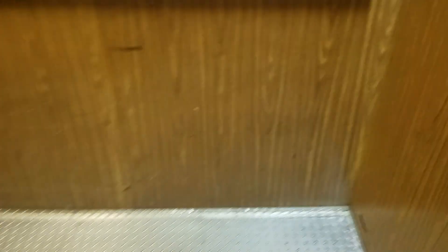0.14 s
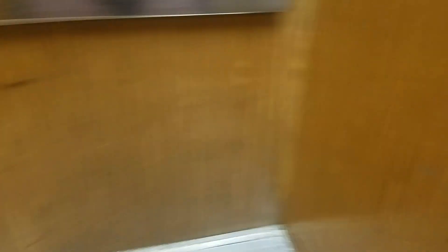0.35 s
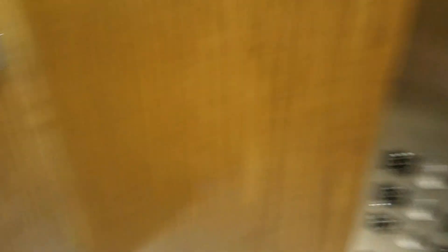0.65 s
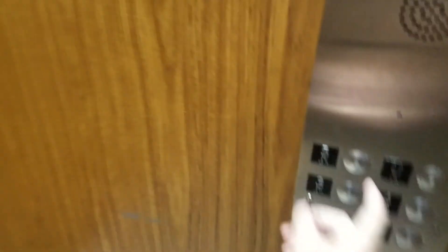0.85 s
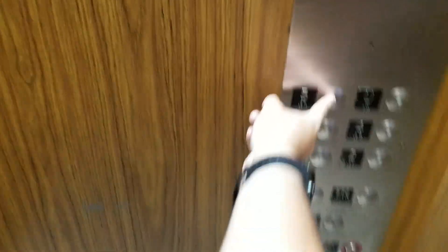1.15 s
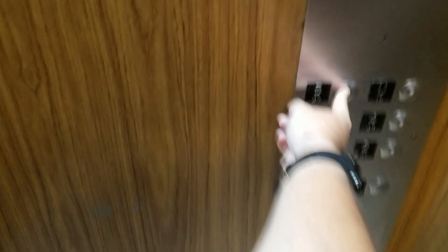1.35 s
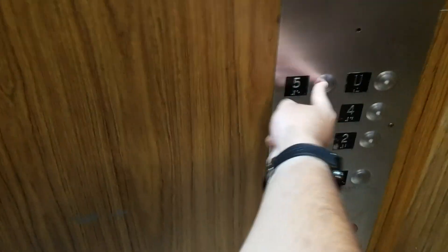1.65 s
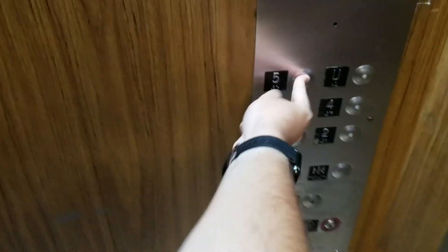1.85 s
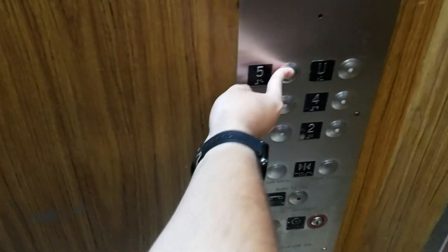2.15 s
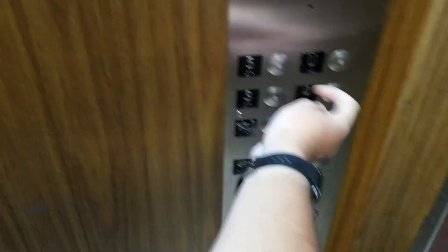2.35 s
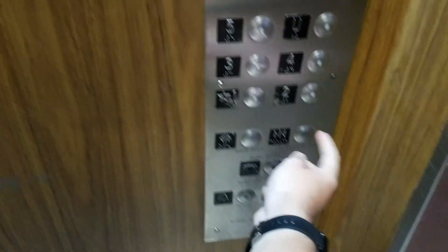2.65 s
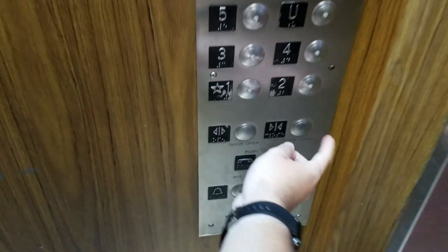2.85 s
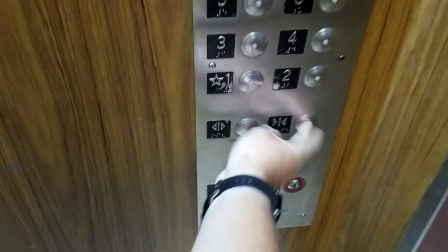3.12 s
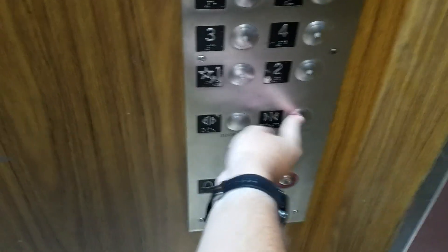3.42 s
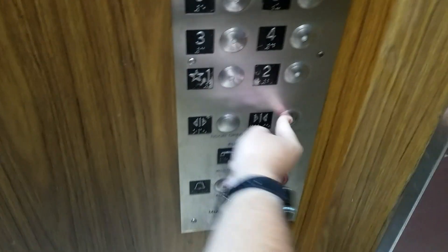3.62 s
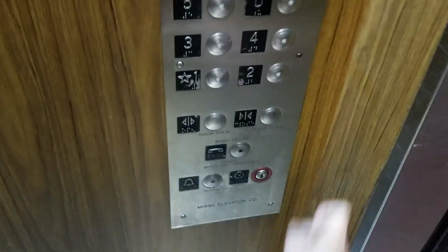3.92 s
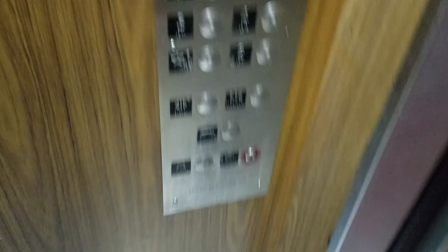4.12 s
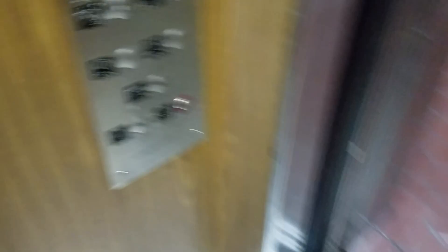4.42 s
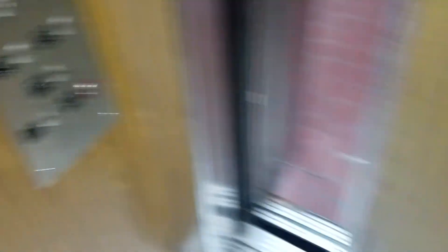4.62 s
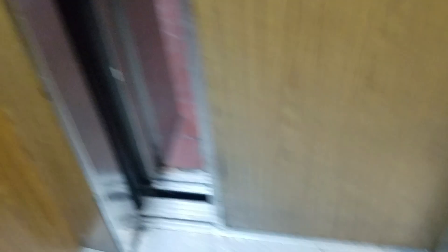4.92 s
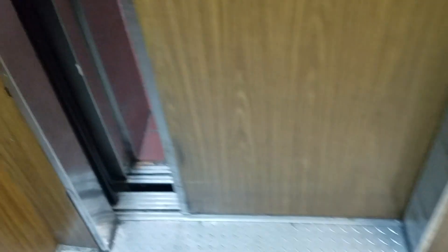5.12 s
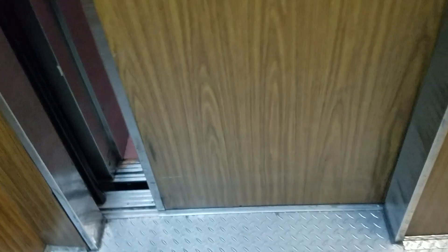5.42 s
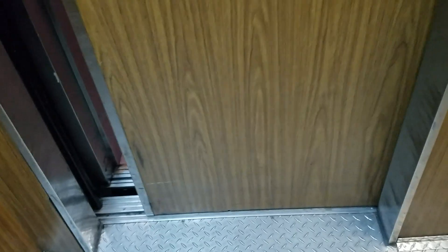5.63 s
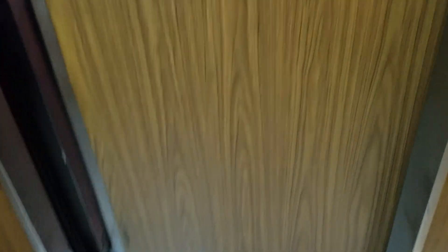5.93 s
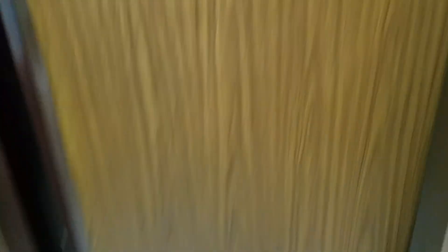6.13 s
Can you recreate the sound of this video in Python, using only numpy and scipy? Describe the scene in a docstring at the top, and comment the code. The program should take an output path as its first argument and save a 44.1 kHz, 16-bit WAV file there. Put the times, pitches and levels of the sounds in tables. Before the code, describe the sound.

Heavy steps clank on a hollow elevator floor, steel buttons click and ring, then the sliding door knocks and whirs shut over machine hum.

```python
"""Inside a small wood-panelled hydraulic elevator: machine hum and a running door drive lie under it all.
Clothes brush and heavy steps land on the hollow car floor: bursts of noise with echoes and floor modes.
Steel buttons then click and ring as clusters of close modes; a drone swells, more steps fall, a shoe squeaks.
The door gear knocks, the drive surges at 5 s and dies down, and the landing fades as the gap closes."""
import sys
import numpy as np
from scipy import signal
from scipy.fft import rfft, irfft, next_fast_len
from scipy.io import wavfile

SR = 44100
rng = np.random.default_rng(int(sys.argv[2]) if len(sys.argv) > 2 else 0)


def unload_wav(signal):
    """Save mono or channel-first audio to the path in sys.argv[1] as 16-bit WAV at rate SR, clipped to [-1, 1]."""
    wavfile.write(
        sys.argv[1],
        SR,
        np.round(np.clip(np.atleast_2d(signal).T, -1, 1) * 32767).astype(np.int16),
    )


N = 276507
TIME = np.arange(N) / SR
SIZE = 32768   # samples in one blow or ring
MOTOR_FADE_S = 0.12

# hollow modes of the car rung through the floor: pitch_hz, level_db (varied per blow), t60_s
FLOOR_MODES = [(94.24, -54.5, 0.98), (109.8, -54, 0.71), (163.44, -55, 0.78), (230.7, -59.5, 0.21),
               (385, -59, 0.69), (435, -59, 0.82), (475.5, -56, 0.5), (706, -50, 0.1), (1270, -66, 0.77),
               (1435, -66, 0.1)]


def from_db(db):
    """Decibels to gain."""
    return 10 ** (np.asarray(db) / 20)


def rms_one(x):
    """Scale to unit power."""
    return x / np.sqrt(np.mean(x ** 2) + 1e-20)


def at_hz(points, hz):
    """Read a spectrum on a log-frequency axis."""
    f, value = np.transpose(points)
    return np.interp(np.log(hz + 1e-9), np.log(f), value)


def drift(rate):
    """Slow chance with spread 1, from `rate` random knots per second."""
    knots = rng.standard_normal(int(N / SR * rate) + 2)
    return rms_one(np.interp(TIME * rate, np.arange(len(knots)), knots))


def held(start, end, fade):
    """Gain that fades in, holds at 1 and fades out."""
    return (np.tanh((TIME - start) / fade) - np.tanh((TIME - end) / fade)) / 2


def diffuse(size):
    """White noise arriving from all sides: left and right are alike in the bass only."""
    # frequency_hz, left-right likeness (0 to 1)
    likeness = [(40, 0.99), (125, 0.91), (250, 0.88), (500, 0.59), (1000, 0.16), (2000, 0), (16000, 0)]
    # frequency_hz, left minus right balance_db
    balance = [(40, 3), (125, 4), (500, 0.5), (1000, 1), (2000, 4), (4000, -3.5), (8000, -0.5), (14000, 1)]
    hz = np.fft.rfftfreq(size, 1 / SR)
    alike = np.clip(at_hz(likeness, hz), -1, 1)
    mid, side = rfft(rng.standard_normal((2, size)))
    sides = np.array([[1], [-1]])
    stereo = np.sqrt(1 + alike) * mid + sides * np.sqrt(1 - alike) * side
    return irfft(stereo * from_db(sides * at_hz(balance, hz) / 2), size)


def noise(spectrum):
    """Steady diffuse noise of a given colour, rms 1."""
    size = next_fast_len(N)
    gain = from_db(at_hz(spectrum, np.fft.rfftfreq(size, 1 / SR)))
    return rms_one(irfft(rfft(diffuse(size)) * gain, size)[:, :N])


def tone(hz, waver_hz, flutter_db):
    """One sine line, rms 1 before its flutter, slightly unsteady in pitch and strength."""
    phase = 2 * np.pi * np.cumsum(hz + waver_hz * drift(9)) / SR
    return np.sqrt(2) * np.sin(phase) * from_db(flutter_db * drift(7))


def causal(gain):
    """The minimum-phase response with these gains: nothing sounds before the blow."""
    cepstrum = irfft(np.log(gain))
    half = len(cepstrum) // 2
    return np.exp(rfft(np.r_[cepstrum[0], 2 * cepstrum[1:half], np.zeros(half)]))


def blow(length, modes, direct_db, pan_db, hardness, linger_db, linger, stretch):
    """Stereo spectrum of one uncoloured blow: the contact, dense wall echoes and the car's hollow modes."""
    # echo decay in the car: frequency_hz, t60_s (before each source's stretch)
    car_t60 = [(40, 0.081), (100, 0.19), (200, 0.42), (500, 0.6), (1000, 0.28), (2500, 0.38), (4500, 0.3),
               (6500, 0.36), (10000, 0.18), (16000, 0.22)]
    t, hz = TIME[:SIZE], np.fft.rfftfreq(SIZE, 1 / SR)
    length = max(length, 5e-4)
    slips = rng.standard_normal(SIZE) ** 3 * (t / length) * np.exp(-3 * t / length)
    # a small, hard contact radiates mostly treble
    slips = signal.lfilter([1, -np.clip(hardness, 0, .95)], [1], slips)
    contact = slips / np.linalg.norm(slips)
    out = from_db([[direct_db + pan_db / 2], [direct_db - pan_db / 2]]) * contact
    build_up = 1 - np.exp(-t / (0.0018 + .45 * length))   # a slow contact fills the car slowly
    # echoes arrive in clumps: 1.3 dB of chance, 250 times a second
    bunched = from_db(1.3 * np.interp(t * 250, np.arange(SIZE), rng.standard_normal(SIZE)))
    white = rfft(diffuse(SIZE))
    for centre in 25 * 2 ** (np.arange(20) / 2):
        band = np.clip(1 - 2 * np.abs(np.log2((hz + 1e-9) / centre)), 0, 1)   # overlapping half octaves
        fall = np.log(1000) * t / (stretch * at_hz(car_t60, centre))
        # the panels ring on after the air
        dying = np.exp(-fall) + from_db(linger_db) * np.exp(-fall / max(linger, 1))
        echoes = irfft(white * band, SIZE) * (build_up * bunched * dying)
        out = out + rms_one(echoes) * np.sqrt(np.mean(band ** 2) / SIZE)
    for mode_hz, level_db, t60 in modes:
        strength = from_db(level_db + rng.normal(0, 2.04))
        ringing = np.sin(2 * np.pi * (mode_hz * t + rng.random()))
        out = out + strength * build_up * np.exp(-np.log(1000) * t / t60) * ringing
    return rfft(out * (1 - (t / t[-1]) ** 4))   # closes to silence


def blows(rows, treble_hz, colour, modes, **contact):
    """Each blow lands at another spot, so has echoes of its own; weight adds boom, a hard contact treble."""
    boom_hz, body_hz, treble_bend = 55, 175.7, 1.98   # boom lies below the body, treble bends up above it
    out, hz = np.zeros((2, N + SIZE)), np.fft.rfftfreq(SIZE, 1 / SR)
    per_octave = SR * np.sqrt(.035 / np.maximum(hz, 30))   # equal power per octave above 30 Hz
    boom = at_hz([(boom_hz, 1), (body_hz, 0)], hz)
    treble = at_hz([(body_hz, 0), (treble_hz, 1)], hz) ** treble_bend
    for s, length, level_db, boom_db, treble_db in rows:
        tilt_db = boom_db * boom + treble_db * treble
        gain = per_octave * from_db(level_db + tilt_db + at_hz(colour, hz))
        start = int(s * SR)
        out[:, start:start + SIZE] += irfft(blow(length, modes, **contact) * causal(gain))
    return out[:, :N]


def rings(rows):
    """A struck part rings as clusters of close modes that beat and die away together."""
    out, t, bins_hz = np.zeros((2, N + SIZE)), TIME[:SIZE], np.fft.rfftfreq(SIZE, 1 / SR)
    for s, hz, spread_hz, level_db, t60 in rows:
        near_pitch = np.exp(-((bins_hz - hz) / (2 * spread_hz)) ** 2)
        cluster = irfft(rfft(diffuse(SIZE)) * near_pitch)
        dying = from_db(-60 * t / t60) * (1 - np.exp(-t * hz / 1.5))   # builds up over 1.5 cycles
        start = int(s * SR)
        ring = rms_one(cluster * dying) * np.sqrt(np.mean(dying ** 2))
        out[:, start:start + SIZE] += from_db(level_db) * ring
    return out[:, :N]


def footsteps():
    """Shoes scuff and thud on the hollow floor, exciting its low modes."""
    # feet on the car floor: start_s, scuff_length_s, level_db, extra boom_db, extra treble_db
    steps = [(.184, .018, -41, -12, -7), (.207, 0.0033, -22, -20, -18.5), (.309, 0.008, -26.5, -18, -35),
             (.435, 0.011, -28.5, -11, -13), (.457, 0.0032, -21.5, -12, -3), (.484, 0.0065, -33, -5, -6),
             (.547, 0.0085, -17.5, -19, -19.5), (.615, .021, -25, -7, -34), (.712, 0.013, -29.5, -2, -22.5),
             (.778, 0.0059, -28, -1.5, -30), (.855, 0.0049, -28, -20.5, -19), (.893, .0045, -38, 10, -22),
             (.955, .02, -29, -11, -26), (1.063, 0.0058, -32, 6, -27.5), (1.155, 0.011, -34, 3, -38),
             (1.32, 0.045, -36.5, 5, -36), (3.246, 0.023, -29.5, -3.5, -37.5),
             (3.275, 0.0098, -25.5, -14.5, -39.5), (3.333, 0.012, -36.5, 5, -48),
             (4.53, 0.038, -33, 0.5, -28), (4.572, 0.0089, -35, 6, -27)]
    # colour of a shoe on the floor: frequency_hz, level_db
    shoe = [(20, -12.5), (40, 1.5), (80, -8.5), (120, -1), (250, -1), (350, -4.5), (550, -2.5), (750, -6),
            (1100, -2.5), (2200, -2), (3500, -2.5), (8000, -3), (12000, -5), (16000, -4.5)]
    return blows(steps, 5300, shoe, FLOOR_MODES, direct_db=-8.0, pan_db=2.0, hardness=0.25,
                 linger_db=-16, linger=3.2, stretch=0.91)


def floor_plates():
    """Loose floor plates clank underfoot, each with modes spread around its pitch."""
    # clanks: start_s, pitch_hz, level_db, t60_s
    clanks = [(0.2079, 530, -12.5, 0.106), (.309, 1090, -32, 0.26), (0.552, 1290, -28, 0.26),
              (.779, 854, -23.5, 0.21)]
    spread = 0.072   # share of the pitch
    return rings([(s, hz, spread * hz, db, t60) for s, hz, db, t60 in clanks])


def buttons():
    """Steel buttons are pressed and snap back: hard contacts, then the cap or the panel rings on."""
    # contacts: start_s, contact_length_s, level_db, extra treble_db, ring_db, part that rings
    contacts = [(1.254, .005, -50.5, 3.5, -10.5, "floor"), (1.285, 0.091, -40, -10.5, -12, "floor"),
                (1.7127, .0042, -44.5, 5.5, 1, "cap"), (2.218, .0046, -51, 8, -31, "floor"),
                (2.2258, 0.0019, -35, 12, -3, "floor"), (3.022, 0.046, -41.5, -30, -29, "cap"),
                (3.086, 0.0084, -40, -17, 0.5, "cap"), (3.383, 0.002, -53, -17.5, -11.5, "cap"),
                (3.6538, 0.0026, -28, -2, 0.5, "close")]
    # colour of the panel: frequency_hz, level_db
    panel = [(30, -14.5), (100, -1.5), (200, -1.5), (350, 1.5), (650, -0.5), (1100, 0), (1600, -1.5),
             (2300, 2), (3700, -2.5), (5000, -1.5), (6500, -1.5), (8800, -6), (12000, -1.5), (16000, -9)]
    # hollow modes of the car rung through the wall: pitch_hz, level_db (varied per blow), t60_s
    wall_modes = [(187.2, -51, 0.92), (256, -64.5, 0.51), (407, -54.5, 0.51), (983, -55.5, 0.34),
                  (1157, -50.5, 0.17), (1555, -54.5, 0.14), (1866, -50, 0.21), (4370, -57, .3),
                  (6170, -61.5, 0.29)]
    # a button's cap, or the floor or door-close button with the panel behind it:
    # pitch_hz, spread_hz, level_db (the contact's ring_db is added), t60_s
    part_modes = {"cap": [(1260, 120, -40, .2), (2200, 177, -35.5, 0.17), (10400, 1500, -41.5, 0.14)],
                  "floor": [(265, 38, -30.5, .68), (2096, 170, -32.5, 0.5), (5830, 1500, -37, 0.85),
                  (11300, 900, -32.5, .38)], "close": [(194.6, 0.94, -16.5, 0.32), (1100, 86, -26, 0.4),
                  (1945, 340, -26.5, 0.41), (6460, 700, -25.5, 0.38), (9800, 2100, -25.5, 0.21)]}
    presses, ringing = [], []
    for s, length, level_db, treble_db, ring_db, part in contacts:
        presses.append((s, length, level_db, 0, treble_db))
        for hz, spread_hz, db, t60 in part_modes[part]:
            ringing.append((s, hz, spread_hz, ring_db + db, t60))
    clicks = blows(presses, 8820, panel, wall_modes, direct_db=-3.0, pan_db=8.5, hardness=0.64,
                   linger_db=-19.5, linger=5.0, stretch=0.64)
    return clicks + rings(ringing)


def door_knocks():
    """The door gear knocks as dull contacts that ring the floor's modes."""
    # knocks: start_s, contact_length_s, level_db, extra boom_db, extra treble_db
    knocks = [(4.248, 0.01, -40, -9, -19), (4.3, 0.02, -35.5, -9, -34), (4.376, 0.0048, -67.5, 0, 14),
              (4.96, 0.11, -39.5, -3, -22), (5.024, 0.01, -30.5, -7.5, -22), (5.256, 0.027, -45, -7, -59)]
    # colour of the gear: frequency_hz, level_db
    gear = [(30, -14), (100, -11), (300, -7), (1000, -3.5), (2500, -1.5), (5000, -10), (12000, -17)]
    return blows(knocks, 5100, gear, FLOOR_MODES, direct_db=-6.5, pan_db=6, hardness=0.084,
                 linger_db=-33, linger=2.0, stretch=0.89)


def squeak():
    """A faint, thin shoe squeak: one high line with a rough pitch."""
    line = tone(2810 + 30 * drift(300), waver_hz=12, flutter_db=2)
    return from_db(-55) * held(3.24, 3.32, .01) * line


def door_travel():
    """Strength of the door's drive, and how much of the landing is heard through the narrowing gap."""
    # door speed: time_s, share of top speed (the first value also holds before its time)
    door_speed = [(3.7, 0.47), (4, 0.34), (4.78, 0.39), (5, 1), (5.2, 0.62), (5.5, 0.38), (5.8, 0.19),
                  (6.27, 0.003)]
    loudness_power = 1.78   # the drive's amplitude grows with this power of the speed
    shut_door_db = -10.5   # what the shut door lets through
    doorway_db, inside_s, walk_in_s = 4, 1.26, 0.27   # the landing is louder until the listener is inside
    speed = np.maximum(np.interp(TIME, *np.transpose(door_speed)), 0)
    gap = 1 - np.cumsum(speed) / np.sum(speed)
    leak = from_db(shut_door_db) ** 2
    in_doorway = (1 - np.tanh((TIME - inside_s) / walk_in_s)) / 2
    landing = np.sqrt(leak + (1 - leak) * gap) * from_db(doorway_db * in_doorway)
    return speed ** loudness_power, landing


def motors():
    """Wavering sine lines: machine hum, drone and whine, and a door motor as loud as its speed allows."""
    # machine hum: pitch_hz, level_db (before the hum gain)
    hum_lines = [(161.5, -59.5), (269.2, -63.5), (313, -64), (333, -62), (416, -65.5), (495.3, -70)]
    # lines that swell and fade together: pitch_hz, level_db (before the drone gain)
    drone_lines = [(107.7, -0.5), (699.8, -12)]
    drive, landing = door_travel()
    hum = sum(from_db(db) * tone(hz, waver_hz=1.77, flutter_db=3.5) for hz, db in hum_lines)
    drone = sum(from_db(db) * tone(hz, waver_hz=.9, flutter_db=2.7) for hz, db in drone_lines)
    whine_on = held(1.2, 2.2, MOTOR_FADE_S) + held(3.8, 5.28, MOTOR_FADE_S)
    whine = from_db(-50.5) * whine_on * tone(352.4, waver_hz=2.476, flutter_db=3.0)
    door_motor = from_db(-36) * drive * tone(195, waver_hz=0.67, flutter_db=4.0)
    hum_gain = from_db(4.5) * landing + from_db(9.5) * drive
    drone_gain = from_db(-45.5) * landing + from_db(-48.5) * held(2.45, 3.4, MOTOR_FADE_S)
    return hum_gain * hum + drone_gain * drone + whine + door_motor


def clothes():
    """Clothes brush as the body turns: fluttering noise with rounded swells."""
    # brushes: peak_s, length_s, level_db
    brushes = [(.04, .012, -42.5), (.077, .025, -34), (.68, .15, -36.5), (1.252, 0.27, -48.5),
               (3.247, .05, -49.5), (4.556, 0.094, -42), (4.966, 0.12, -53.5)]
    # colour of cloth: frequency_hz, level_db per Hz
    cloth = [(200, -3), (600, 10.5), (1200, 3.5), (2000, 3), (3200, -10), (6000, -11), (9000, -18.5),
             (12000, -10.5), (16000, -23)]
    swells = sum(from_db(db) / (1 + ((TIME - s) / length) ** 2) ** 1.14 for s, length, db in brushes)
    return (from_db(-62) + swells) * from_db(1.2 * drift(55)) * noise(cloth)


def rumble():
    """Low noise of the floor: the car sways when weight shifts, the door rollers turn, the landing rumbles."""
    # sways: start_s, level_db (before rise and fall)
    sways = [(0.451, -27.5), (1.05, -25.5), (3.3, -32.5), (4.55, -31.5)]
    # colour of the rumble: frequency_hz, level_db
    colour = [(15, 0.5), (28, 1.5), (40, 3.5), (52, 0), (64, -6.5), (80, -9.5), (100, 0.5), (160, -18.5),
              (400, -55.5)]
    rise_s, fall_db_per_s = 0.1, 24.5
    drive, landing = door_travel()
    sway = 0
    for s, db in sways:
        since = TIME - s
        falling = from_db(db - fall_db_per_s * np.maximum(since, 0))
        sway = sway + falling * np.clip(since / rise_s, 0, 1)
    rollers = from_db(-39) * drive
    steady = from_db(-42) * landing
    return np.sqrt(sway ** 2 + rollers ** 2 + steady ** 2) * noise(colour)


def air():
    """Air in the shaft, dimmed by the closing door, under a faint steady hiss."""
    # colour of the shaft air: frequency_hz, level_db per Hz
    colour = [(59, -26.5), (100, -7), (119, -6.5), (135, -9.5), (271, -8), (322, -10), (350, -7),
              (373, -12.5), (648, -16.5), (705, -16), (1390, -21.5), (2130, -25.5), (9210, -59.5),
              (14700, -50.5), (16000, -51)]
    _, landing = door_travel()
    hiss = from_db(-68.5) * noise([(3000, -8.5), (6500, 5.0), (9500, -6.5), (13000, 6.5), (16000, 4.0)])
    return from_db(-40.5) * landing * noise(colour) + hiss


def scene():
    """Steps, buttons and door sound in the car, over its hum."""
    contacts = footsteps() + floor_plates() + buttons() + door_knocks() + squeak()
    return contacts + motors() + clothes() + rumble() + air()


def record(dry):
    """The highest peaks are rounded; the deepest bass and the top are cut."""
    rounded = dry / (1 + (dry / .85) ** 4) ** .25
    bass_cut = signal.butter(2, 22, "high", fs=SR, output="sos")
    top_cut = signal.ellip(14, .1, 100, 15900, fs=SR, output="sos")
    return signal.sosfilt(top_cut, signal.sosfilt(bass_cut, rounded))


dry = scene()
out = record(dry)
unload_wav(out)
```